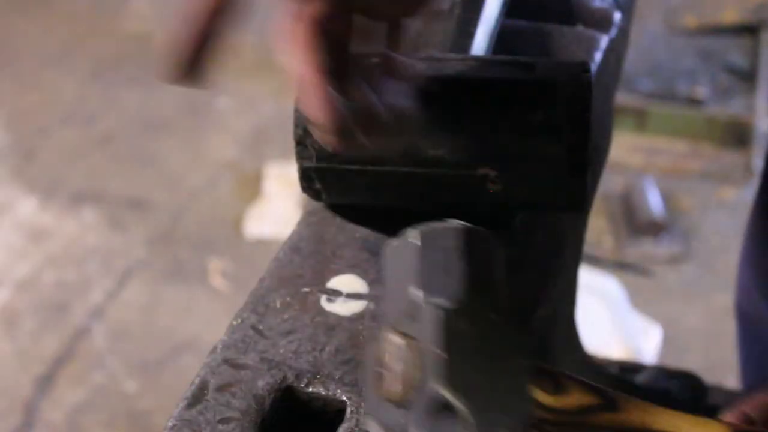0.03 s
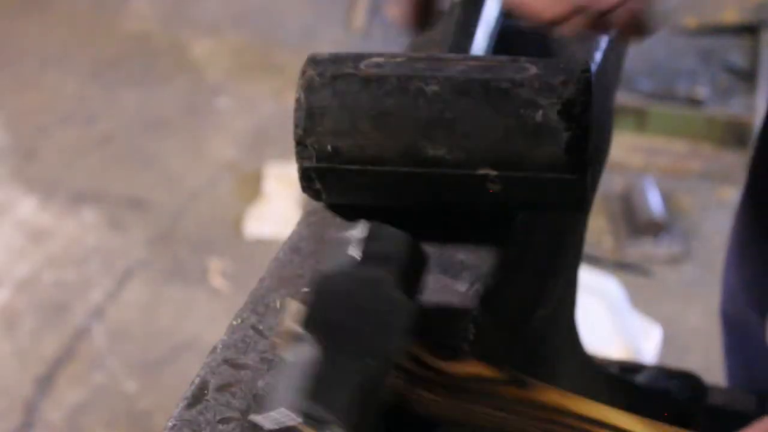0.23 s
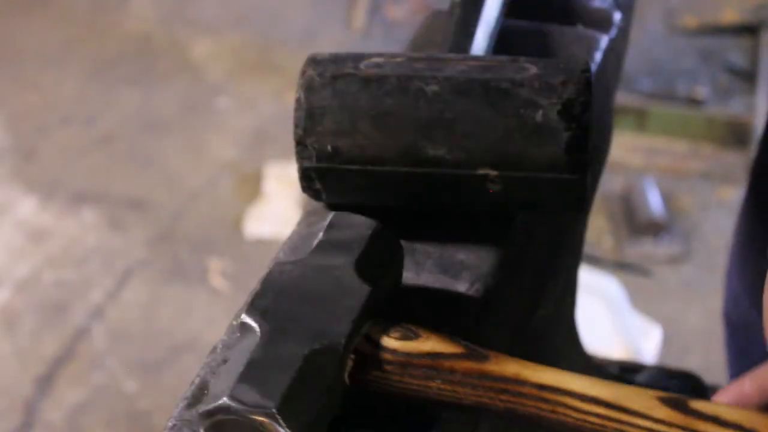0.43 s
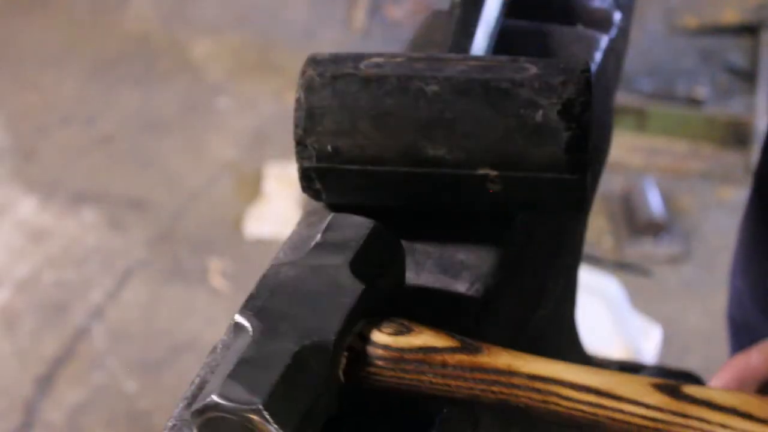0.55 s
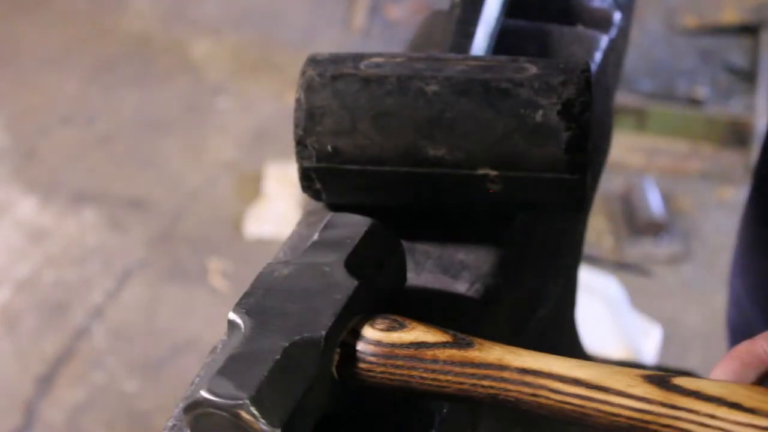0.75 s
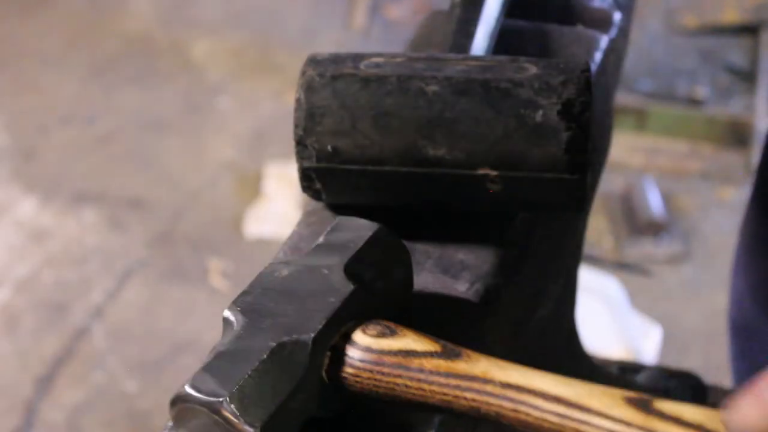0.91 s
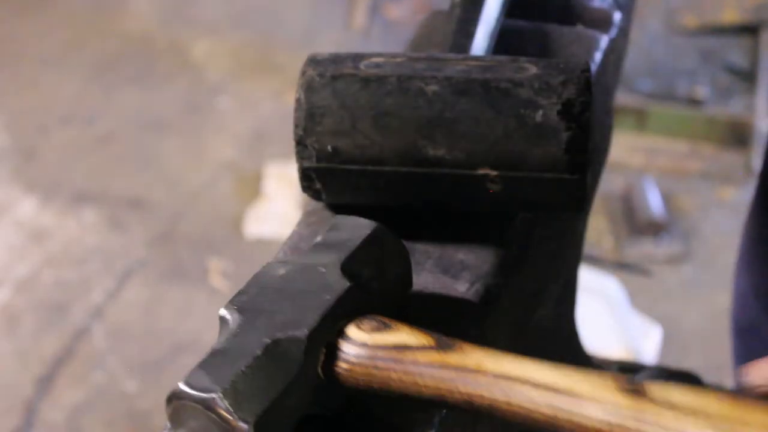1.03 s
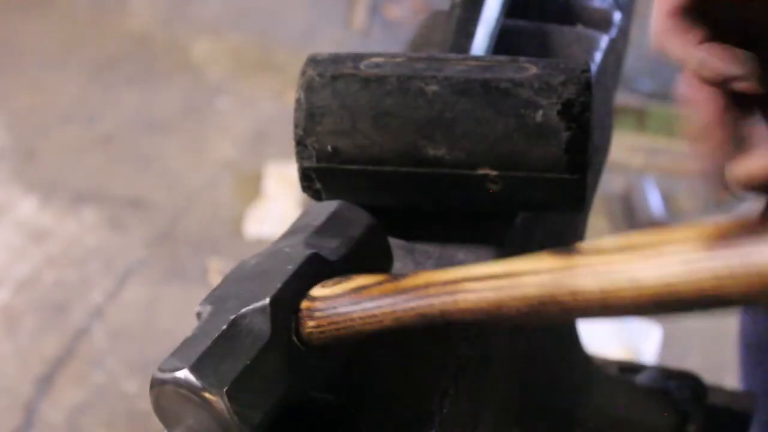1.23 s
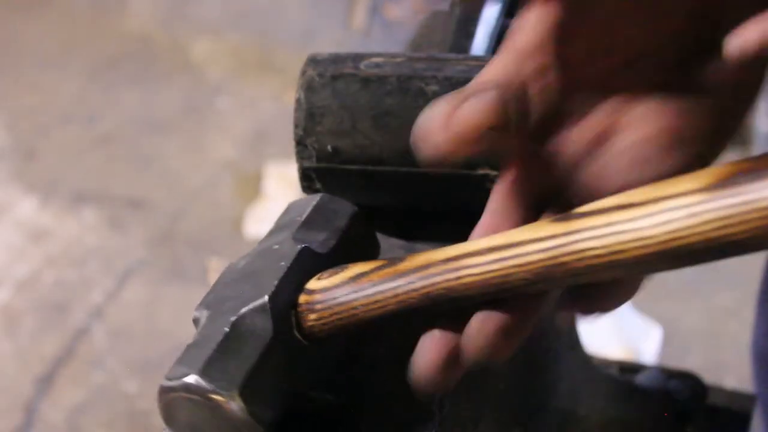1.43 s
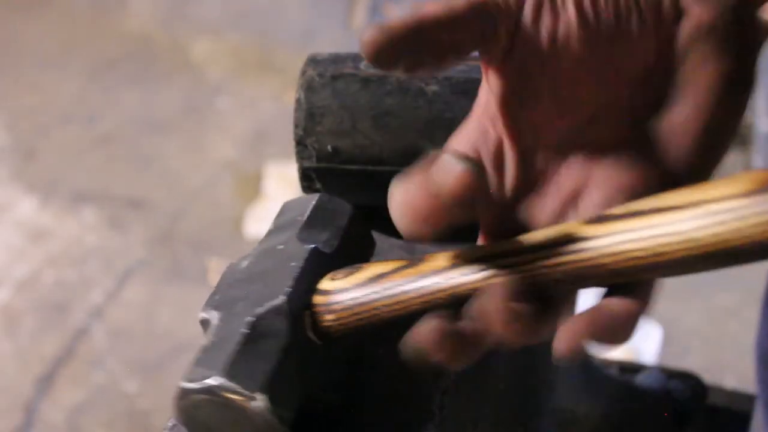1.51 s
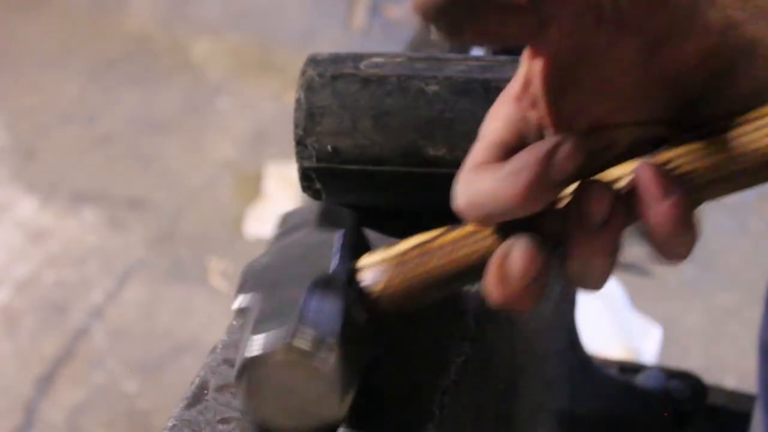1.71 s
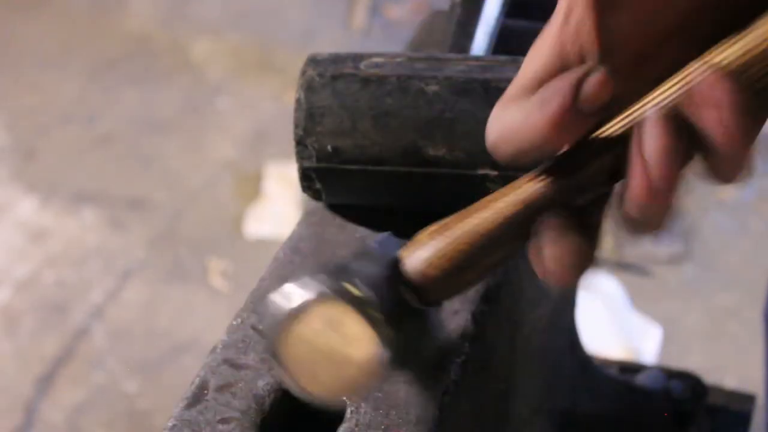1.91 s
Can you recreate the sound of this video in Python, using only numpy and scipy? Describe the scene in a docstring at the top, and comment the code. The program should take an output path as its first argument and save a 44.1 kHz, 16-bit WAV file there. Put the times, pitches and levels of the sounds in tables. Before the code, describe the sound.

A steel hammer is set on an anvil with a loud, sharp clank, a quick bounce and a short ring. A hand slides softly along the wooden handle, then the head knocks more lightly as it lifts, in a small workshop.

```python
"""Hammer on an anvil

A steel hammer is set down on an anvil in a small workshop: it clanks, bounces, rocks to rest and rings.
A hand slides along the wooden handle. The head knocks the anvil again as it is lifted and ticks as it
leaves. The room echoes, over a faint hiss, hum and drone. The first clank overloads the microphone,
whose automatic volume control dips and recovers."""
import sys
import numpy as np
from scipy import signal
from scipy.fft import rfft, irfft
from scipy.io import wavfile

SR = 44100
rng = np.random.default_rng(int(sys.argv[2]) if len(sys.argv) > 2 else 0)


def generate_wav(sig):
    """Save sig (samples, or channels by samples) to the path in sys.argv[1] as 16-bit PCM at SR."""
    pcm = np.round(np.clip(np.atleast_2d(sig).T, -1, 1) * 32767).astype(np.int16)
    wavfile.write(sys.argv[1], SR, pcm)


N = 85995
T = np.arange(N) / SR

# The head hits the anvil as it is set down, then picked up: start_s, strength_db, brightness_hz
SET_DOWN_HITS = [(0.2484, 1.5, 5500), (0.2785, -24, 3500), (0.3075, -9, 2830), (0.3375, -36, 2480),
                 (0.3855, -31.5, 6000), (0.3897, -14.5, 2320)]
PICK_UP_HITS = [(1.6903, -21, 5570), (1.7425, -39.5, 6100)]
# Short tones of the clank (a fade is a drop of 60 dB): pitch_hz, set_down_db, pick_up_db, fade_s
CLANK_TONES = [(233, -34.5, -10.5, 0.025), (574, -19, -15.5, 0.073), (794.3, -8.5, -21, .025),
               (845, -5.5, 1.5, 0.019), (1056, -7.5, 3.5, 0.02), (1481, -12, -16, 0.039),
               (1773, -7.5, 2.5, 0.033), (1978.5, 4, 3.5, 0.01), (2232, 7.5, 6, 0.016),
               (2990, -5.5, -36, 0.017), (3830, -2.5, -21, 0.012), (4600, -20.5, -0.5, 0.0017),
               (5500, -5, -5, 0.0033), (6640, -18, -25, 0.016), (8900, -22, -32, 0.014),
               (12400, -34, -17, .015)]
# Noise of steel meeting steel: frequency_hz, level_db
CRACK_SPECTRUM = [(30, -32.5), (200, -15.5), (1000, -7), (4000, -4), (8000, -24), (12000, -25.5),
                  (16000, -40)]
# Long tones of the ringing steel: pitch_hz
RING_PITCHES = [544, 596, 872, 906, 982, 1064, 1168, 1366, 1525, 1713, 1796, 1820, 2056, 2145, 2191, 2223,
                2255, 2291, 2372, 2440, 2654, 3090, 3871, 4764, 5060, 5599, 6578, 7940]
# How strong each long tone is at the two spots where the head hits: level_db
RING_SET_DOWN_LEVELS = [-33, -31, -19, -23, -20, -25, -24, -23, -25, -28, -20, -20, -15, -24, -23, -17, -20,
                        -21, -22, -20, -21, -22, -33, -22, -39, -23, -42, -45]
RING_PICK_UP_LEVELS = [-17, -23, -25, -23, -3, -12, -22, -8, -18, -18, -15, -15, -11, -14, -30, -30, -30,
                       -26, -15, -11, -14, -31, -28, -17, -40, -23, -35, -42]
# How long the steel rings when nothing shortens it: pitch_hz, fade_s
RING_FADES = [(550, .36), (1000, .32), (2200, .29), (3500, .28), (4800, .37), (5600, .35), (8000, .28)]
# Light ticks of the head's edge: start_s, level_db, decay_s
EDGE_TICKS = [(0.856, -44.5, 0.003), (1.301, -50.5, 0.009), (1.7455, -38, 0.0012), (1.8196, -29, 0.0032)]
# Noise of a tick: frequency_hz, level_db
TICK_SPECTRUM = [(200, -18), (1100, -1), (2000, -1), (3200, -3), (4800, 3), (6500, -2), (8000, -10),
                 (10000, -16), (13000, -28), (16000, -40)]
# Knocks and rubs of the handle and the tilting head: start_s, level_db, pitch_hz, length_s
SOFT_KNOCKS = [(0.539, -50.5, 233, 0.016), (0.853, -52, 1052, 0.012), (0.857, -58, 2830, .01),
               (1.557, -51, 4600, .01), (1.568, -51.5, 300, 0.019), (1.569, -49.5, 920, 0.017),
               (1.631, -53, 936, 0.034), (1.667, -52.5, 950, 0.023)]
# Loudness of the sliding palm: time_s, level_db
PALM_LEVELS = [(1.41, -72), (1.45, -53.5), (1.52, -54), (1.575, -53.5), (1.6, -60.5), (1.68, -60.5),
               (1.83, -53.5), (1.88, -58), (1.95, -56)]
# Hiss of skin on wood: frequency_hz, level_db
PALM_SPECTRUM = [(300, -19), (1500, -5), (2800, 1.5), (3600, -2.5), (4600, 0), (7500, -3.5), (10500, -6),
                 (13000, -19.5), (16000, -25)]
# Narrow scraping tones in that hiss: pitch_hz, level_db
SCRAPE_TONES = [(2810, -11), (4620, -6), (6010, -6)]
# How strongly the room reflects sound: frequency_hz, level_db
ROOM_SPECTRUM = [(60, -10.5), (170, -1.5), (400, -4), (600, 1.5), (800, -1), (1000, -3), (1250, 3),
                 (1750, -2.5), (2450, -1), (3300, -3), (4800, -11.5), (6800, -7), (9500, -9.5),
                 (15000, -11)]
# How long the reflections last: frequency_hz, fade_s
ROOM_FADES = [(150, 0.65), (600, .36), (2000, 0.22), (5000, .25), (12000, 0.17)]
# Workshop air and hiss: frequency_hz, level_db
AIR_SPECTRUM = [(35, -38.5), (60, -17), (76, -6.5), (206, -10), (285, -2), (423, -8.5), (642, -5.5),
                (705, -8), (1100, -10.5), (1170, -9), (5980, -20), (9970, -25.5), (15500, -43.5)]
# Loudness of a faint, hollow drone: time_s, level_db
DRONE_LEVELS = [(0, -53.5), (.2, -57), (.6, -82.5), (1.1, -67.5), (1.23, -54), (1.42, -71), (1.8, -56.5),
                (1.93, -50.5)]


def clank(hits, tone_levels_db):
    """Each hit is a short push that makes a noisy crack and quickly fading tones in the steel."""
    force = np.zeros(N)
    for start_s, strength_db, brightness_hz in hits:
        # a softer contact spreads the push out in time, so it sounds duller
        r = np.exp(-2 * np.pi * brightness_hz / SR)
        force += signal.lfilter([(1 - r) ** 2], [1, -2 * r, r * r], push(start_s, strength_db) + 1e-18)
    force = filtered(force, 170, "high")  # the steel gives off little bass
    pitches_hz, _, _, fades_s = np.transpose(CLANK_TONES)
    crack = noise(CRACK_SPECTRUM) * decay(0, decay_s=0.0038)
    tones = fading_tones(pitches_hz, tone_levels_db, fades_s)
    return from_db(1) * (convolve(force, crack) + convolve(force, tones))


def ring(hits, tone_levels_db, fade_share):
    """The first of the hits sets the steel ringing, for a share of its full ring time."""
    start_s, strength_db, _ = hits[0]
    fades_s = fade_share * at_hz(RING_FADES, np.array(RING_PITCHES))
    tones = fading_tones(RING_PITCHES, tone_levels_db, fades_s)
    return convolve(push(start_s, strength_db - 1), tones)


def overload_thump(pitch_hz=54.7):
    """A low, dead thump as the first clank overloads the microphone."""
    start_s = SET_DOWN_HITS[0][0]
    return from_db(-25) * decay(start_s, decay_s=0.005) * np.sin(2 * np.pi * pitch_hz * (T - start_s))


def edge_ticks():
    """The edge of the head touches the anvil in tiny, dry bursts of noise."""
    loudness = sum(from_db(db) * decay(start_s, decay_s) for start_s, db, decay_s in EDGE_TICKS)
    return filtered(noise(TICK_SPECTRUM) * loudness, 9000, "low")


def soft_knocks():
    """The handle and the tilting head knock and rub: brief swells of pitched noise."""
    knocks = np.zeros(N)
    for start_s, level_db, pitch_hz, length_s in SOFT_KNOCKS:
        swell = np.sin(np.pi * np.clip((T - start_s) / length_s, 0, 1))
        burst = swell * pitched_noise(pitch_hz, sharpness=11.3)
        knocks += from_db(level_db) * burst * np.sqrt(length_s * SR / np.sum(burst ** 2))
    return knocks


def palm_slide(grip_s=1.59):
    """Skin hisses along the wood, and also scrapes until the hand grips the handle."""
    scrape = sum(from_db(db) * pitched_noise(hz, sharpness=32) for hz, db in SCRAPE_TONES)
    sliding = np.clip((grip_s - T) / 0.015, 0, 1)
    return level(PALM_LEVELS) * (noise(PALM_SPECTRUM) + sliding * scrape)


def nearby_echo(sound, delay_s=0.0041):
    """A hard surface close by sends back one quieter, duller copy."""
    delayed = np.pad(sound, (int(delay_s * SR), 0))[:N]
    return from_db(-5) * filtered(delayed, 3500, "low")


def room_reverb(sound, delay_s=0.004, build_s=0.005):
    """Many reflections build up quickly and die away, the low ones lasting longest."""
    edges_hz = np.geomspace(50, 16000, 18)
    white_noise = rng.standard_normal((2, N))
    age_s = np.maximum(T - delay_s, 0)
    tail = np.zeros(N)
    for k, band_hz in enumerate(zip(edges_hz, edges_hz[1:])):
        middle_hz = np.sqrt(np.prod(band_hz))
        shape = (1 - np.exp(-age_s / build_s)) * from_db(-60 * age_s / at_hz(ROOM_FADES, middle_hz))
        band = filtered(white_noise[k % 2], band_hz, "band")
        tail += from_db(at_hz(ROOM_SPECTRUM, middle_hz)) * band * shape / np.sqrt(np.sum(shape ** 2))
    return convolve(sound, tail)


def background(hum_hz=51):
    """Hissing air, the hum of mains electricity and a wavering drone."""
    air = from_db(-53.5) * noise(AIR_SPECTRUM)
    hum = from_db(-68) * np.sqrt(2) * np.sin(2 * np.pi * hum_hz * T)
    drone = level(DRONE_LEVELS) * pitched_noise(pitch_hz=655, sharpness=6)
    return air + hum + drone


def fading_tones(pitches_hz, levels_db, fades_s):
    """Struck steel vibrates at many pitches at once; neighbouring tones swing in opposite directions."""
    t = T[:SR]
    return sum((-1) ** k * from_db(db - 60 * t / fade_s) * np.sin(2 * np.pi * hz * t)
               for k, (hz, db, fade_s) in enumerate(zip(pitches_hz, levels_db, fades_s)))


def push(start_s, strength_db):
    """A push one sample long."""
    return from_db(strength_db) * (np.arange(N) == int(start_s * SR))


def decay(start_s, decay_s):
    """Jump to 1, then fall to about a third every decay_s."""
    return (T >= start_s) * np.exp(-np.maximum(T - start_s, 0) / decay_s)


def noise(spectrum, top_hz=15600):
    """Noise whose lows and highs follow a table."""
    hz = np.arange(N // 2 + 1) * SR / N
    gains = from_db(at_hz(spectrum, hz)) * (hz < top_hz)
    return unit_level(irfft(rfft(rng.standard_normal(N)) * gains, N))


def pitched_noise(pitch_hz, sharpness):
    """Noise filtered twice around one pitch; sharper sounds more like a tone."""
    b, a = signal.iirpeak(pitch_hz, sharpness, fs=SR)
    return unit_level(signal.lfilter(b, a, signal.lfilter(b, a, rng.standard_normal(N))))


def filtered(sound, edge_hz, keep):
    """Keep the "low" side or the "high" side of an edge, or the "band" between two."""
    return signal.sosfilt(signal.butter(2, edge_hz, keep, fs=SR, output="sos"), sound)


def convolve(sound, response):
    """Every sample of the sound sets off its own copy of the response."""
    return signal.fftconvolve(sound, response)[:N]


def at_hz(table, hz):
    """Read between a table's rows, spacing frequencies by octaves."""
    table_hz, values = np.transpose(table)
    return np.interp(np.log(hz + 0.00092), np.log(table_hz), values)


def level(table):
    """A volume curve through rows of time_s, level_db."""
    return from_db(np.interp(T, *np.transpose(table)))


def unit_level(sound):
    """Scale to an average (rms) level of 1."""
    return sound / np.sqrt(np.mean(sound ** 2) + 1e-20)


def from_db(db):
    """Turn decibels into a multiplier."""
    return 10 ** (np.asarray(db) / 20)


def scene():
    """Mix hammer, hand and room into one channel."""
    _, set_down_db, pick_up_db, _ = np.transpose(CLANK_TONES)
    clanks = clank(SET_DOWN_HITS, set_down_db) + clank(PICK_UP_HITS, pick_up_db)
    ringing = ring(SET_DOWN_HITS, RING_SET_DOWN_LEVELS, fade_share=0.99)
    ringing += ring(PICK_UP_HITS, RING_PICK_UP_LEVELS, fade_share=0.75)  # the grip shortens the ring
    contacts = clanks + edge_ticks() + soft_knocks()
    room = nearby_echo(clanks) + room_reverb(contacts + from_db(-14) * ringing)
    return (contacts + ringing + overload_thump() + palm_slide() + room + background())[None]


def record(dry, threshold_db=-5.5, react_s=0.016, recover_db_per_s=63.5):
    """The microphone's volume dips and recovers, but reacts too late to stop the first peak clipping."""
    excess_db = np.maximum(20 * np.log10(np.abs(dry[0]) + 1e-9) - threshold_db, 0)
    recovery_db = recover_db_per_s * T
    held_db = np.maximum.accumulate(excess_db + recovery_db) - recovery_db
    lag = np.exp(-1 / (react_s * SR))
    dip_db = signal.lfilter([1 - lag], [1, -lag], held_db)
    clipped = np.clip(dry * from_db(-dip_db), -1, 1)
    treble_cut = signal.cheby2(12, 70, 21000, fs=SR, output="sos")  # removes only the very top
    return signal.sosfilt(treble_cut, clipped)


dry = scene()
out = record(dry)
generate_wav(out)
```